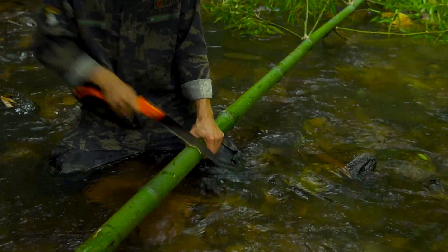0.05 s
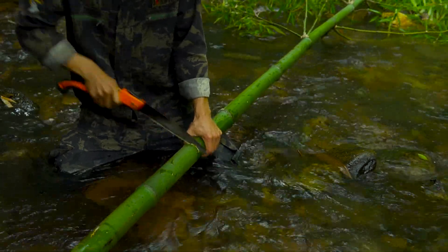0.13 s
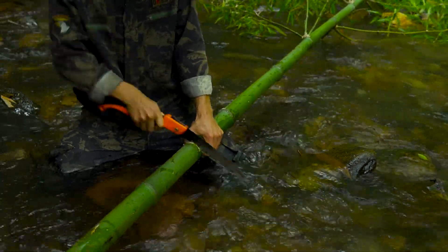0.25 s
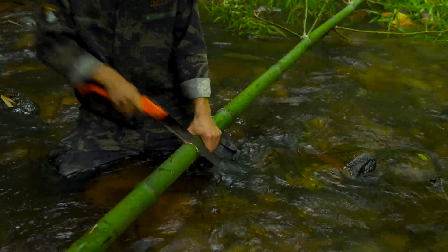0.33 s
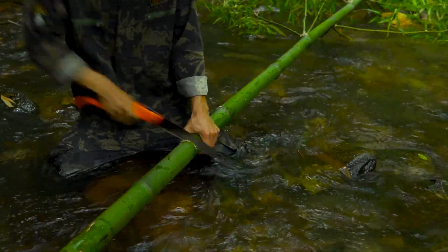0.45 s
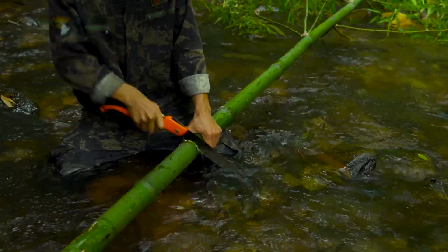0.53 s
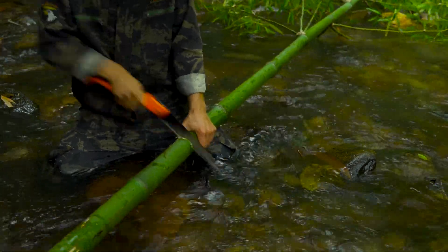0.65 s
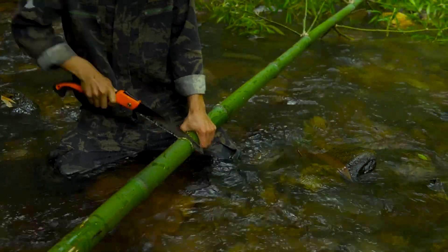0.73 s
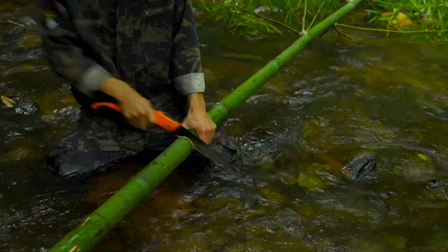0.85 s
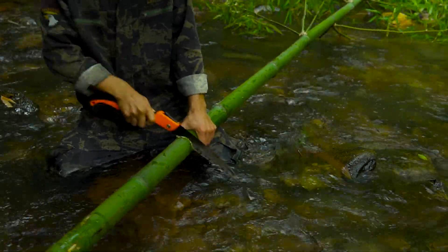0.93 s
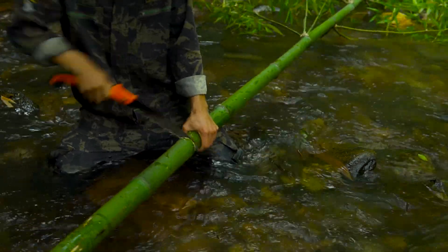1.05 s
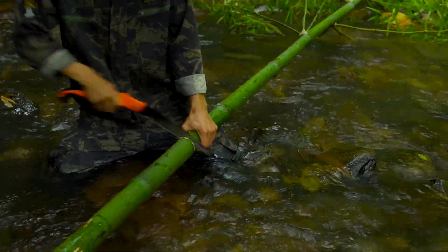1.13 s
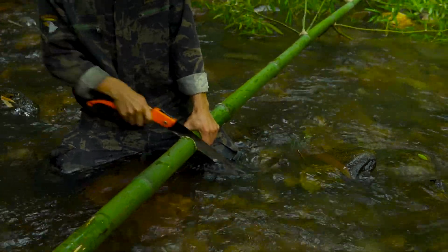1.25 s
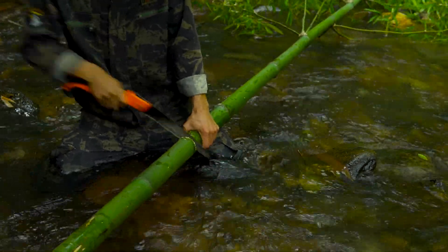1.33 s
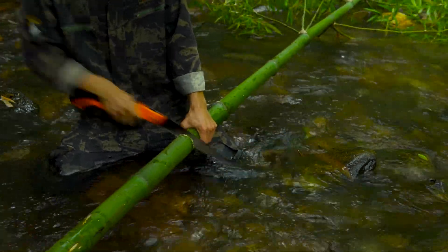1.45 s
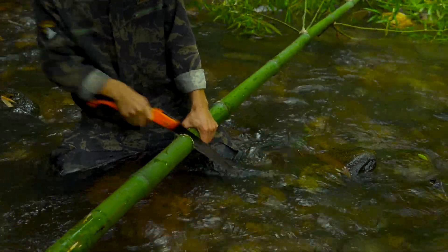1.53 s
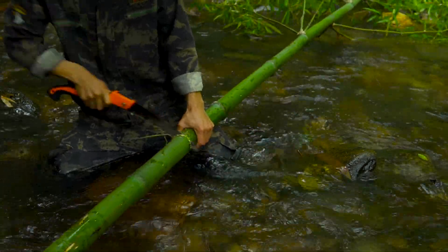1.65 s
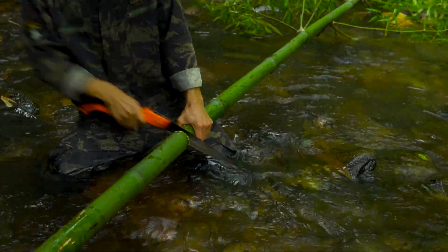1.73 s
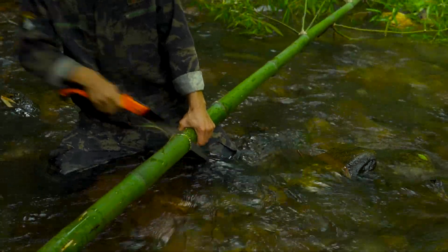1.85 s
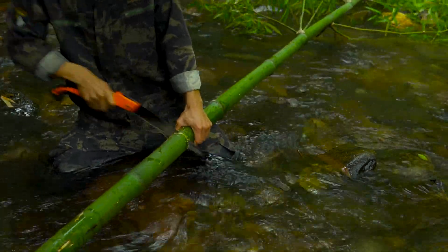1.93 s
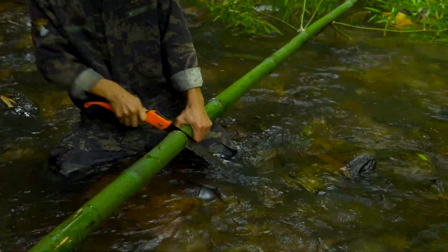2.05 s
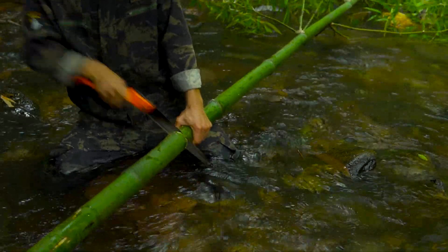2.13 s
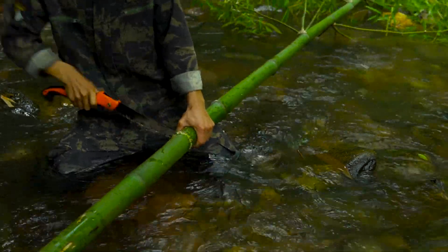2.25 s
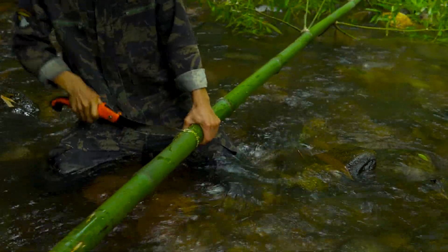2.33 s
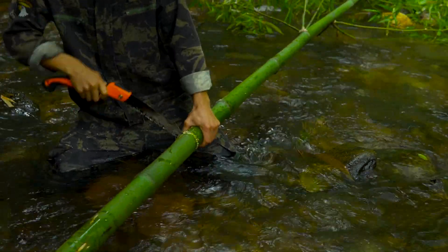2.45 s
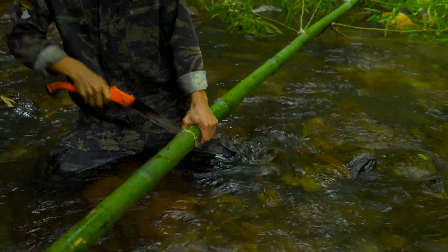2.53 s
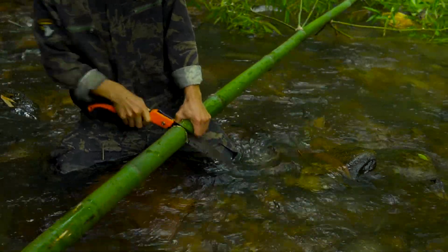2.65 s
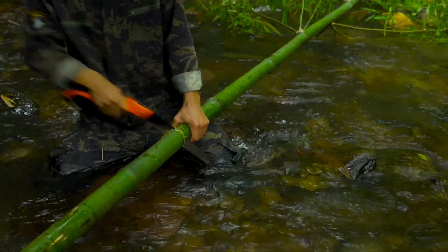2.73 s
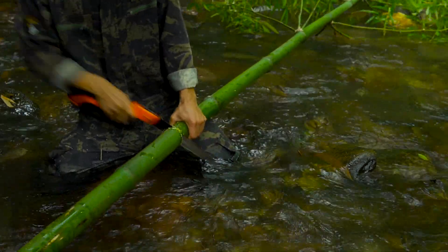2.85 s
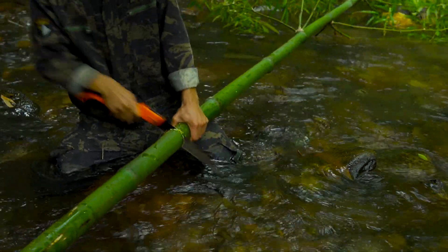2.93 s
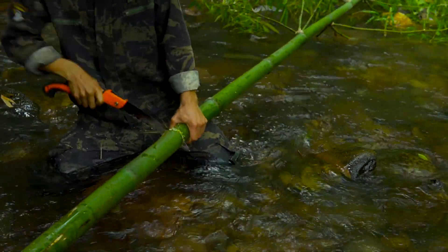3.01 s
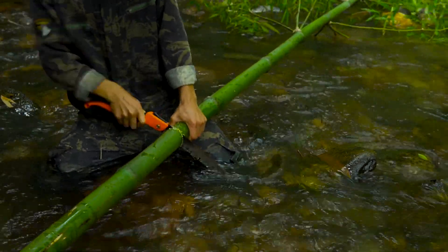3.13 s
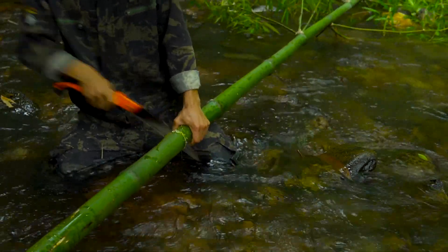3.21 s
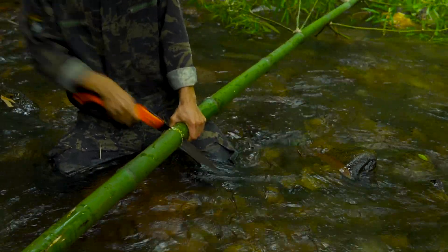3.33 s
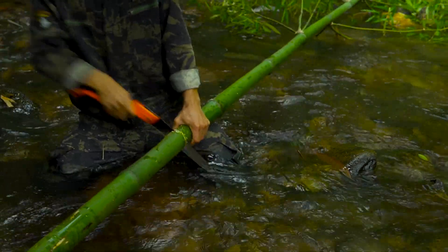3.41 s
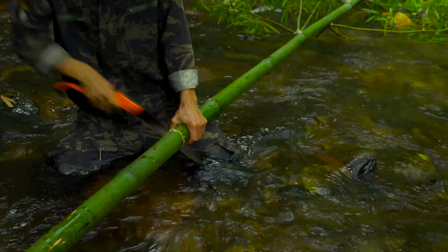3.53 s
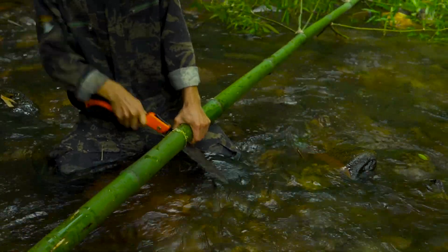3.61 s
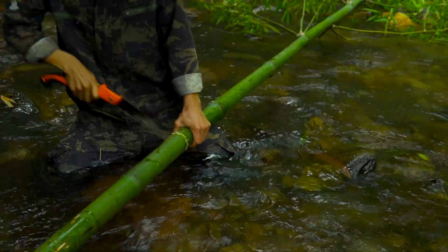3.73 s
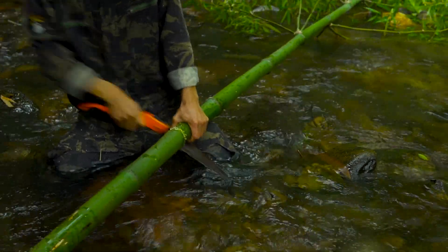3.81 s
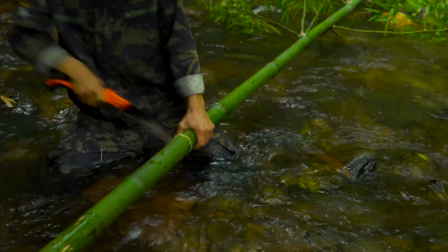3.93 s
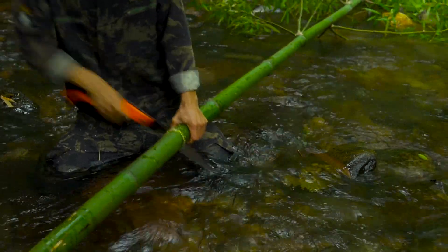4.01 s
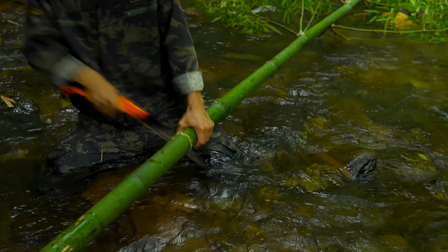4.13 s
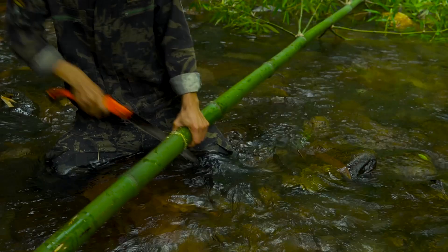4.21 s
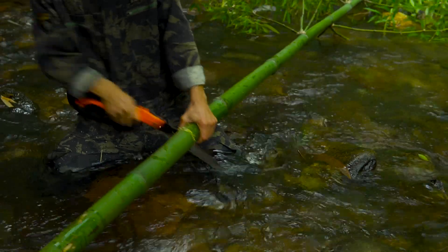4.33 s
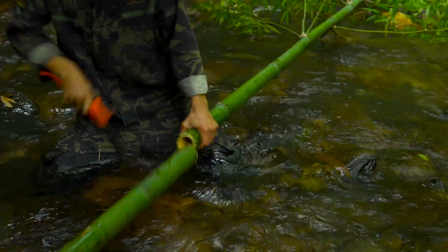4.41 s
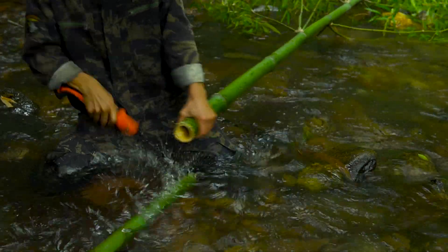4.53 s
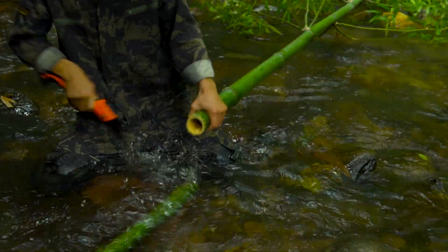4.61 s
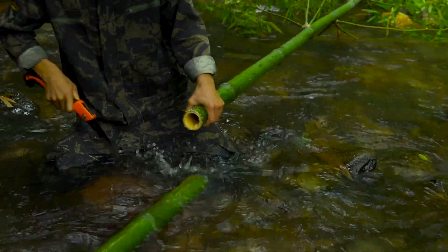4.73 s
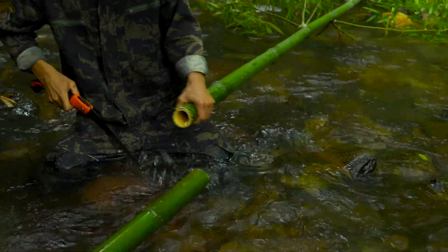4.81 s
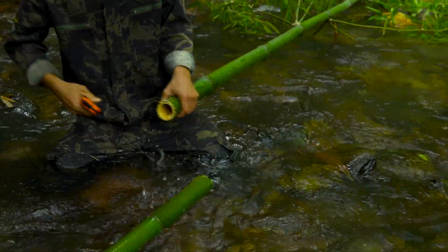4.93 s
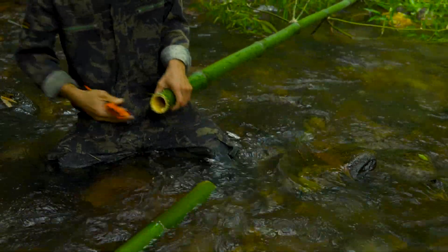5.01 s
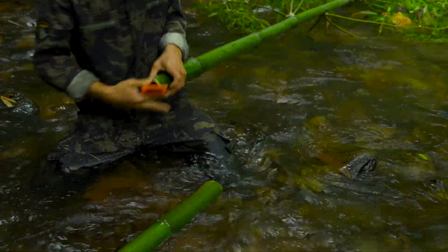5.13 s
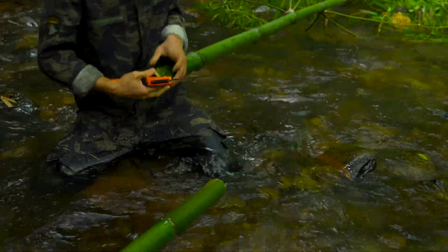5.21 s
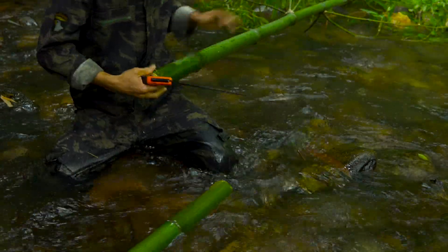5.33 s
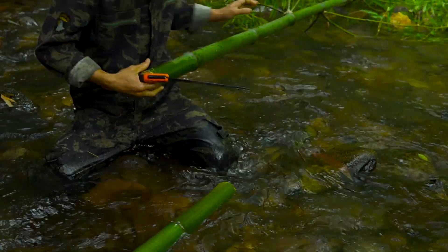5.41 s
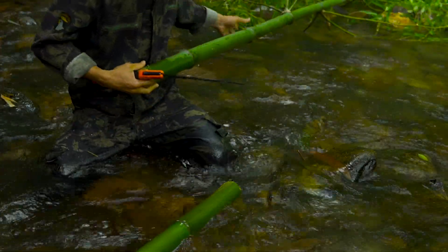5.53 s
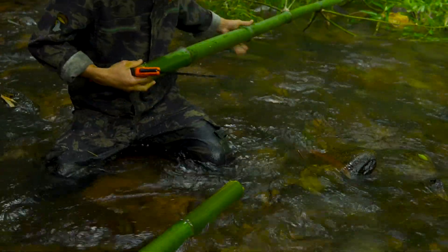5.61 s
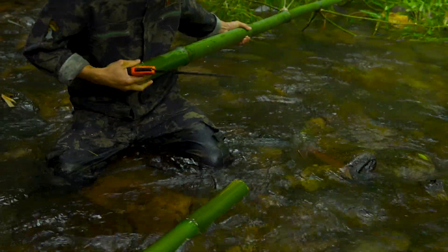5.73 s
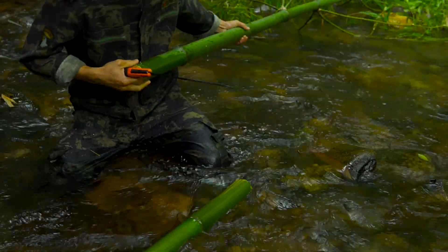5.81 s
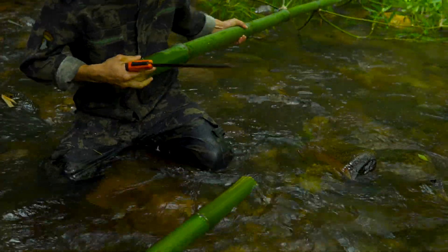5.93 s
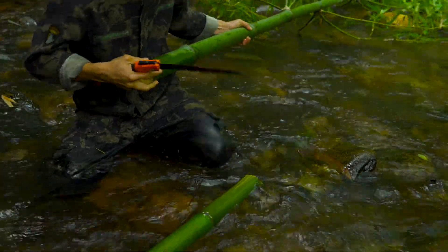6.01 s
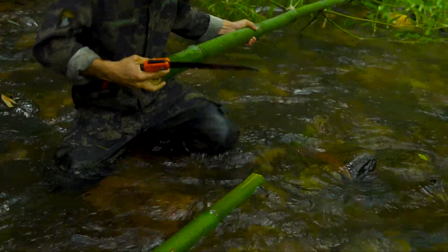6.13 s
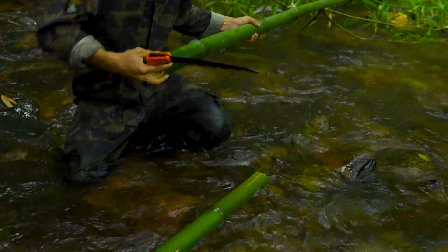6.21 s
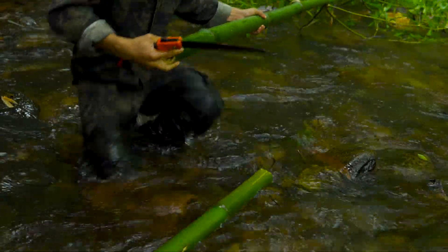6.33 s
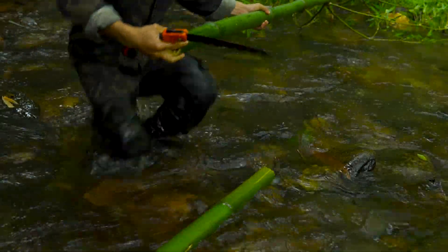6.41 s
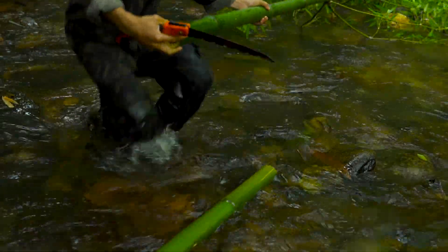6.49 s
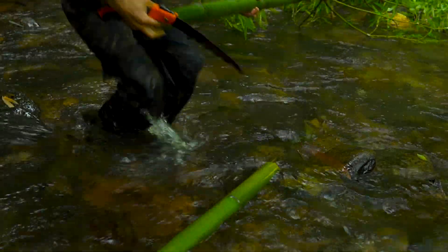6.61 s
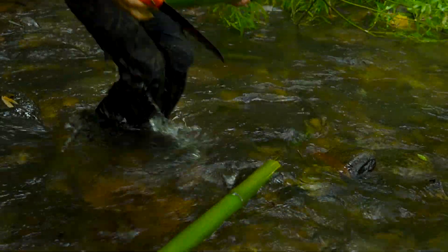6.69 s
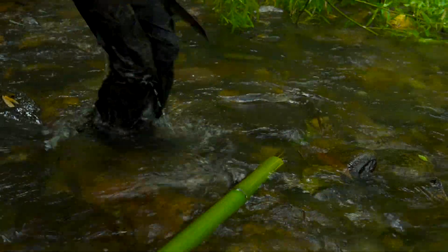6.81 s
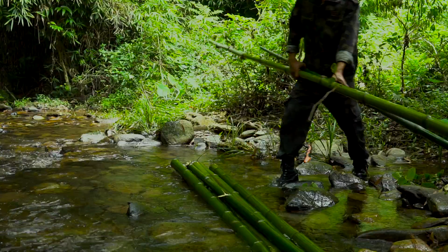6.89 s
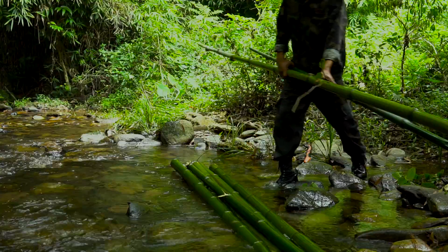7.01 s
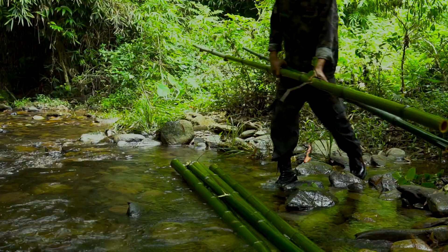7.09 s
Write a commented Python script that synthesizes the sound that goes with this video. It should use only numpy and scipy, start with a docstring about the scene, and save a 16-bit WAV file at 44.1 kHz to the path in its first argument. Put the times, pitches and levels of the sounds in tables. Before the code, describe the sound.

Close by, a bamboo pole is sawn in rapid, uneven strokes over the steady wash of a shallow creek. The steel teeth snag and rattle, making the tube resonate, with a few light knocks. The sawing stops and the cut piece drops with a brief splash and gulps. The water carries on softly with scattered drips, swells a little, and jumps louder with a sharp click at the very end.

```python
"""A hand saw rasps through green bamboo, hollow on the push and thinner on the pull, over a shallow stream.
The teeth catch and chatter in the cut, ringing the tube wall and the steel blade; the pole knocks.
The cut end drops into the water with a splash and gulps of air. The stream, a wash of countless bubbles,
babbles on, swells as the kneeling sawyer stands up, and with a click is suddenly much closer at the end."""
import sys
import numpy as np
from scipy import signal
from scipy.io import wavfile
from scipy.ndimage import uniform_filter1d, minimum_filter1d

SR = 44100
rng = np.random.default_rng(int(sys.argv[2]) if len(sys.argv) > 2 else 0)


def pcm_store(signal):
    """Save signal as 16-bit PCM."""
    levels = np.round(np.clip(np.atleast_2d(signal), -1, 1) * 32767)
    wavfile.write(sys.argv[1], SR, levels.astype(np.int16).T)


N = 315756
TIME = np.arange(N) / SR


# Saw strokes; hollow_db lifts the tube wall, high on the push: start_s, force_db, hollow_db
STROKES = [(0.0, -30.5, 11), (0.055, -23, 0.5), (0.196, -29.5, 10.5), (0.336, -24.5, 1.5), (0.482, -31, 12),
           (0.609, -19, -0.5), (0.675, -15, 3.5), (0.701, -22, -3), (0.848, -24.5, 5), (1.038, -23.5, -4.5),
           (1.181, -28.5, 8), (1.334, -21.5, 0), (1.475, -24, 5.5), (1.6, -23.5, -2.5), (1.731, -24, 4.5),
           (1.864, -27, -1.5), (1.999, -22, 0), (2.178, -18, -8.5), (2.239, -21.5, -1.5), (2.601, -26.5, 5),
           (2.758, -24, -4.5), (2.892, -23, 2.5), (2.995, -26.5, -1.5), (3.105, -23, 3), (3.23, -27, -2.5),
           (3.354, -24, 4), (3.458, -27.5, -3), (3.583, -22.5, 2.5), (3.7, -25.5, -4.5), (3.821, -23, 0.5),
           (3.934, -24.5, -4.5), (4.052, -22.5, -1), (4.16, -21, -5), (4.279, -23.5, 3.5),
           (4.384, -21, -3.5), (4.497, -28, 1.5)]
# Where the saw sticks or rests: stop_s
STOPS_S = [0.175, 0.312, .457, 0.655, 0.689, 0.804, 0.961, 1.154, 1.449, 2.104, 2.209, 2.28, 3.08,
           4.036, 4.262, 4.476, 4.559]

def stroke_force(rise_s, fall_s, lumps_db):
    """The blade speeds up, drags unevenly through the fibres and stops to turn."""
    force = np.zeros(N)
    next_strokes = STROKES[1:] + [(np.inf, 0, 0)]
    for (start, force_db, hollow_db), (next_start, _, next_hollow_db) in zip(STROKES, next_strokes):
        turn_s = 0.0052 if next_hollow_db > hollow_db else 0.013   # quicker into a hollower stroke
        end = min([next_start - turn_s] + [s for s in STOPS_S if s > start])
        span = slice(max(int((start - rise_s) * SR), 0), int((end + fall_s) * SR))
        ramp = np.minimum((TIME[span] - start) / rise_s, (end - TIME[span]) / fall_s)
        force[span] += np.clip(ramp / 2 + .5, 0, 1) ** 2 * from_db(force_db)
    return force * from_db(lumps_db * (drift(160) + 0.5 * drift(67)) - 9.5)


def saw():
    """Teeth rub, slip and catch, driving the tube wall and the blade; each stroke sets their shares."""
    blows, swells = tooth_catches(rise_s=.0027, fall_s=.0031)
    force = np.hypot(stroke_force(rise_s=0.01, fall_s=0.02, lumps_db=0.5), 0.09 * swells)
    starts, _, hollows = np.transpose(STROKES)
    stroke = np.maximum(np.searchsorted(starts - .01, TIME) - 1, 0)
    hollow_db = hollows[stroke]
    fibre_snaps = grains(200, spread_db=-7.0)
    rub = (grains(12000, spread_db=5.5) + 0.5 * fibre_snaps) * force
    teeth = rub + 1.4 * blows
    slips = stick_slip(per_s=180) * force
    bites = from_db(-0.5) * slips + grains(5000, spread_db=2.5) * force + 0.63 * blows
    return (tube_wall(bites, hollow_db) + blade(teeth) + rasp(rub, blows, hollow_db, starts[stroke])
            + dry_cracks(slips, swells, hollow_db))


def stick_slip(per_s):
    """Teeth stick and slip in the wall: a nearly even train of clicks of random size."""
    teeth_passed = np.floor(np.cumsum(per_s / SR * from_db(2.0 * drift(54))))
    return rms_one(np.diff(teeth_passed, prepend=0) * rng.standard_normal(N))


# Single snags of a tooth: time_s, level_db
LONE_CATCHES = [(0.078, -5), (0.169, -10), (0.237, -14.5), (0.457, -14.5), (0.508, -3), (0.633, -18),
                (0.654, -9), (0.707, -8.5), (0.722, -14), (0.979, -12.5), (1.045, 0), (1.101, -6),
                (1.264, -11.5), (1.779, -10), (2.119, -13), (2.177, -5), (2.305, -13.5), (2.332, -12),
                (2.36, -8), (2.498, -23.5), (2.694, -15), (3.001, -8.5), (3.076, -8.5), (3.142, -15),
                (3.205, -25), (3.335, -12), (3.437, -11), (4.174, -10), (4.39, -12), (4.416, -16)]
# Tooth after tooth snagging: start_s, level_db, length_s
CHATTER_RUNS = [(0.351, -11, 0.11), (0.681, -15, 0.01), (1.199, -10.5, 0.017), (1.613, 1, 0.025),
                (1.872, -5.5, 0.087), (2.204, -9.5, 0.011), (2.238, -8.5, 0.027), (2.387, -9.5, 0.012),
                (2.642, -9.5, 0.014), (2.767, -4, 0.035), (3.01, -7, 0.048), (3.233, -6, 0.072),
                (3.479, -5.5, 0.068), (3.716, -8, 0.068), (3.945, -8, 0.067)]

def tooth_catches(rise_s, fall_s, gap_s=.019, loss_db_per_s=35):
    """Each catch is a brief swell of force with a sharp blow at its top; chatter repeats it, fading."""
    t = np.arange(round(.03 * SR)) / SR
    swell = np.exp(-t / fall_s) - np.exp(-t / rise_s)
    blows = np.zeros(N)
    for start_s, level_db, length_s in [row + (0,) for row in LONE_CATCHES] + CHATTER_RUNS:
        delays = np.linspace(0, length_s, 1 + round(length_s / gap_s))
        onsets = ((start_s + delays - .003) * SR).astype(int)
        blows[onsets] = from_db(level_db - loss_db_per_s * delays)
    return np.roll(blows, swell.argmax()), signal.fftconvolve(blows, swell / swell.max())[:N]


# Woody body of the bamboo tube: pitch_hz, width_hz, level_db
WALL_MODES = [(226, 40, -7), (411, 82, -4.5), (695, 340, -2), (885, 247, -1), (1107, 128, -3),
              (1314, 118, 1), (1716, 420, -2)]

def tube_wall(bites, hollow_db):
    """Biting teeth knock on the hollow wall and set it resonating."""
    wall = resonate(bites * from_db(hollow_db + 21.5), WALL_MODES, shifting_db=2.0)
    return resonate(wall, [(1200, 2400, 0)])


# Bright voice of the blade in the cut, and its ring when gripped: pitch_hz, width_hz, level_db
BLADE_MODES = [(2254, 180, 11.5), (2620, 400, 13), (3134, 780, 11.5), (4260, 1000, 10.5)]
RING_MODES = [(3560, 400, 13), (4040, 200, 25)]

def blade(teeth, full_depth_s=3.6):
    """The steel rings more clearly as the cut grips it deeper; the wet cut damps its treble."""
    steel = resonate(teeth * from_db(14.5), BLADE_MODES, shifting_db=1.3)
    steel = resonate(steel, [(3200, 3000, 0)])
    ring = resonate(teeth, RING_MODES, shifting_db=6.5)
    grip = np.clip(TIME / full_depth_s, 0, 1) ** 2
    return filtered(steel, "low", hz=3850, order=4) + filtered(ring, "low", hz=4330, order=8) * grip


# High sizzle of the thin steel: pitch_hz, width_hz, level_db
RASP_MODES = [(4390, 180, 6.5), (5470, 580, 0), (6230, 320, 1.5), (7270, 880, -5.5), (9100, 320, -3.5),
              (10040, 480, -9.5), (11670, 320, -6), (13500, 470, -16.5), (15200, 600, -22),
              (9100, 15000, -11)]

def rasp(rub, blows, hollow_db, stroke_start_s, sink_db_per_s=2):
    """Tearing fibres excite the steel's top modes, less on hollow strokes and as the blade sinks in."""
    tearing = rub * from_db(17 - 0.31 * hollow_db - sink_db_per_s * stroke_start_s)
    tearing += blows * from_db(17.5 - sink_db_per_s * TIME)
    return resonate(resonate(tearing, RASP_MODES, shifting_db=3.2), [(9000, 12000, 0)])


def dry_cracks(slips, swells, hollow_db):
    """Slips and catches also reach the ear directly, as cracks with no pitch."""
    slip_cracks = resonate(slips * from_db(hollow_db + 8), [(1600, 3000, 0)])
    crunch = from_db(-12.5) * swells * grains(6000, spread_db=4.0)
    return slip_cracks + resonate(crunch, [(3500, 9000, 0)])


# The pole jolted or dropped: time_s, level_db
POLE_KNOCKS = [(0.512, -28), (0.989, -30.5), (2.299, -28), (4.139, -26.5), (4.363, -22), (4.535, -24)]
# Its ring after a knock: pitch_hz, level_db, t60_s
POLE_MODES = [(217, 1, 0.33), (430.5, 13.5, 0.19), (548, 24.5, 0.037), (663, 24.5, 0.043),
              (1400, 23, 0.033)]

def pole_knocks():
    """Every knock strikes each decaying mode of the pole with a strength of its own."""
    onsets = [round(time_s * SR) for time_s, _ in POLE_KNOCKS]
    knock_db = np.array(POLE_KNOCKS)[:, 1] - 20.0
    scatter_db = 2.0 * rng.standard_normal((len(onsets), len(POLE_MODES)))
    out = np.zeros(N)
    for k, (pitch_hz, level_db, t60_s) in enumerate(POLE_MODES):
        strikes = np.full(N, 1e-18)
        strikes[onsets] = from_db(knock_db + level_db + scatter_db[:, k])
        decay, angle = from_db(-60 / (t60_s * SR)), 2 * np.pi * pitch_hz / SR
        out += signal.lfilter([0, np.sin(angle)], [1, -2 * decay * np.cos(angle), decay ** 2], strikes)
    return out


# Dull low thumps of overload on loud peaks: time_s, peak_db
OVERLOAD_THUMPS = [(0.239, -36), (.512, -26), (1.287, -37), (2.052, -37), (2.392, -43), (3.189, -36)]

def overload_thumps(rise_s=0.0031):
    """Smooth pulses at set times give the low thump of a loud peak overloading the recorder."""
    out, pulse = np.zeros(N), np.hanning(round(2 * rise_s * SR))
    for time_s, peak_db in OVERLOAD_THUMPS:
        add(out, time_s - rise_s, from_db(peak_db) * pulse)
    return out


def bubble(start_hz, end_hz, length_s):
    """A sine that glides as the pocket of air nears the surface; quick swell, slower fade."""
    progress = np.linspace(0, 1, round(length_s * SR))
    pitch_hz = start_hz * (end_hz / start_hz) ** progress
    return np.sin(np.pi * progress ** 0.43) * np.sin(2 * np.pi * np.cumsum(pitch_hz) / SR)


# Gulps, plops and, at 6.928 s, a sharp click: start_s, start_hz, end_hz, length_s, peak_db
GULPS_AND_CLICK = [(4.606, 487, 510, 0.015, -29.5), (4.637, 408.4, 378, 0.0425, -35.5),
                   (4.705, 115, 144, 0.0245, -40.5), (4.833, 119, 306, 0.22, -51),
                   (5.144, 1330, 1384, 0.022, -38), (5.574, 500, 875, 0.065, -39),
                   (6.007, 720, 810, 0.045, -35.5), (6.414, 530, 1270, 0.035, -29.5),
                   (6.555, 1666, 2000, 0.038, -30.5), (6.705, 1046, 1090, 0.015, -23),
                   (6.928, 2770, 2590, 0.0034, -12), (6.935, 1120, 1430, 0.0051, -16),
                   (7.056, 1420, 1250, 0.015, -14.5)]
# Bright drips: start_s, peak_db, pitch_hz
BRIGHT_DRIPS = [(4.6753, -32, 3680), (5.1408, -29.5, 3070), (6, -24.5, 3660), (6.5993, -31, 4120),
                (6.6592, -26, 3940), (6.717, -26, 3120), (6.8513, -30, 2070)]
# Sharp ticks of spray: start_s, peak_db
SPRAY_TICKS = [(5.345, -34), (5.447, -26), (6.5487, -25)]

def gulps_drips_and_click(drip_cycles=19, tick_cycles=3.6, tick_hz=7940):
    """Short sines: bubbles, drips, spray, and a click where the sound cuts to the closer stream."""
    out = np.zeros(N)
    for start_s, start_hz, end_hz, length_s, peak_db in GULPS_AND_CLICK:
        add(out, start_s, from_db(peak_db) * bubble(start_hz, end_hz, length_s))
    for start_s, peak_db, pitch_hz in BRIGHT_DRIPS:
        add(out, start_s, from_db(peak_db) * bubble(pitch_hz, pitch_hz * 1.03, drip_cycles / pitch_hz))
    for start_s, peak_db in SPRAY_TICKS:
        add(out, start_s, from_db(peak_db) * bubble(tick_hz, tick_hz, tick_cycles / tick_hz))
    return out


# Level ride of the stream, up while the sawing stirs it and as the sawyer stands: time_s, level_db
STREAM_LEVEL = [(0, -26.5), (2.52, -31), (4.56, -30), (4.6, -40.5), (4.93, -38.5), (5.3, -40.5),
                (6.1, -37.5), (6.35, -39), (7.16, -32.5)]
# Throaty tone of water close by: pitch_hz, width_hz, level_db
NEAR_THROAT = [(1210, 900, -9.5)]

def stream(splash_s=4.64, splash_rise_s=0.025, splash_fall_s=0.06, stand_s=4.9, closer_s=6.925):
    """Near bubbles over a far wash, stirred by the cut end's splash and the sawyer rising; ends close."""
    rush = wash(low_hz=20, flicker_db=1.1, flicker_rate=18)
    babble = bubble_cloud(count=2200, low_hz=800, octaves=2.6, cycles=8.0, spread_db=4.0)
    spray = bubble_cloud(count=700, low_hz=1800, octaves=2.4, cycles=4.0, spread_db=3.5)
    gurgle = bubble_cloud(count=350, low_hz=380, octaves=2.4, cycles=10.0, spread_db=2.5)
    babble_db = -8 + 10 * np.exp(-((TIME - splash_s) / splash_fall_s) ** 2)
    babble_db += 4 * np.exp(-((TIME - stand_s) / 0.15) ** 2)
    water = rms_one(rush + from_db(babble_db) * babble + from_db(-9.5) * spray + from_db(-12) * gurgle)
    near = TIME > closer_s
    water += near * rms_one(resonate(water, NEAR_THROAT)) * from_db(NEAR_THROAT[0][2])
    flow_db = np.interp(TIME, *np.transpose(STREAM_LEVEL))
    splash_db = np.interp(TIME, [splash_s - splash_rise_s, splash_s, splash_s + splash_fall_s], [0, 7, 0])
    closer_db = near * (10.5 - 18.5 * (TIME - closer_s))   # jumps up, then settles
    return water * from_db(flow_db + splash_db + closer_db)


def bubble_cloud(count, low_hz, octaves, cycles, spread_db, clumps_db=8):
    """Small bubbles in random clusters, a few much louder than the rest; rms 1."""
    out, activity = np.zeros(N), np.cumsum(from_db(clumps_db * drift(9)))
    activity /= activity[-1]
    for when, pitch, rise, size in rng.random((count, 4)):
        hz = low_hz * 2 ** (octaves * pitch)
        gain = from_db(-spread_db * np.log(size + .05))
        add(out, np.interp(when, activity, TIME), gain * bubble(hz, hz * (1 + .3 * rise), cycles / hz))
    return rms_one(out)


# Tone curve of the far water: frequency_hz, density_db
WASH_SPECTRUM = [(24, -58), (100, -46), (230, -29), (400, -9), (600, -4.5), (1300, -3.5), (2400, -6),
                 (4000, -5.5), (4800, -14.5), (16000, -25.5)]

def wash(low_hz, flicker_db, flicker_rate):
    """Countless far bubbles blur into half-octave bands of flickering noise; rms 1."""
    hz, density_db = np.transpose(WASH_SPECTRUM)
    edges = np.append(low_hz * 2 ** np.arange(0, np.log2(.44 * SR / low_hz), .5), .45 * SR)
    out, shared_flicker = 0, drift(flicker_rate)
    white = rng.standard_normal((2, N))   # alternated, so neighbouring bands are unrelated
    for k, (low, high) in enumerate(zip(edges, edges[1:])):
        band = filtered(white[k % 2], "band", hz=[low, high], order=2)
        band_db = np.interp(np.log(low * high) / 2, np.log(hz), density_db)
        out += band * from_db(band_db + flicker_db * (shared_flicker + drift(flicker_rate)))
    return rms_one(out)


def resonate(x, modes, shifting_db=0):
    """Parallel modes (pitch_hz, width_hz, level_db); each may swell and fade as the contact moves."""
    out = 0
    for k, (pitch_hz, width_hz, level_db) in enumerate(modes):
        r = np.exp(-np.pi * width_hz / SR)
        feedback = [1, -2 * r * np.cos(2 * np.pi * pitch_hz / SR), r * r]
        gain = from_db(level_db + shifting_db * drift(12.0)) if shifting_db else from_db(level_db)
        out += (-1) ** k * gain * signal.lfilter([(1 - r * r) / 2, 0, (r * r - 1) / 2], feedback, x)
    return out


def grains(per_s, spread_db):
    """Random clicks of uneven size and either sign; rms 1."""
    sizes = from_db(spread_db * np.minimum(rng.exponential(1, N), 5)) * rng.choice([-1, 1], N)
    return rms_one(sizes * (rng.random(N) < per_s / SR))


def drift(rate_hz):
    """A random wander of rms about 1: noise twice through a one-pole low-pass."""
    r = np.exp(-16 * np.pi * rate_hz / SR)   # runs at an eighth of the sample rate
    slow = signal.lfilter([1], [1, -2 * r, r * r], rng.standard_normal(N // 8 + 4002))[4000:]
    return np.interp(np.arange(N) / 8, np.arange(len(slow)), rms_one(slow))


def filtered(x, kind, hz, order):
    """A low-, high- or band-pass with a flat passband."""
    return signal.sosfilt(signal.butter(order, hz, kind, fs=SR, output="sos"), x)


def from_db(db):
    """Decibels to gain."""
    return 10 ** (np.asarray(db) / 20)


def rms_one(x):
    """Scales to rms 1."""
    return x / np.sqrt(np.mean(x ** 2) + 1e-20)


def add(out, start_s, sound):
    """Mixes a short sound in at a time."""
    i = round(start_s * SR)
    out[i:i + len(sound)] += sound[:N - i]


def scene():
    """Saw, pole and stream in the open air, in mono; a thin pole radiates little bass."""
    bamboo = filtered(saw() + pole_knocks(), "high", hz=170, order=2)
    return (bamboo + overload_thumps() + gulps_drips_and_click() + stream())[None]


def record(dry):
    """A quick limiter ducks the loudest peaks, soft clipping rounds the rest, and the top is cut."""
    limit, ceiling, cutoff_hz = .7, 1.1, 15750
    allowed = limit / np.maximum(np.abs(dry), limit)
    gain = uniform_filter1d(minimum_filter1d(allowed, size=45), size=45)
    rounded = ceiling * np.tanh(dry * gain / ceiling)
    return signal.sosfilt(signal.ellip(10, .5, 70, cutoff_hz, fs=SR, output="sos"), rounded)


dry = scene()
out = record(dry)
pcm_store(out)
```